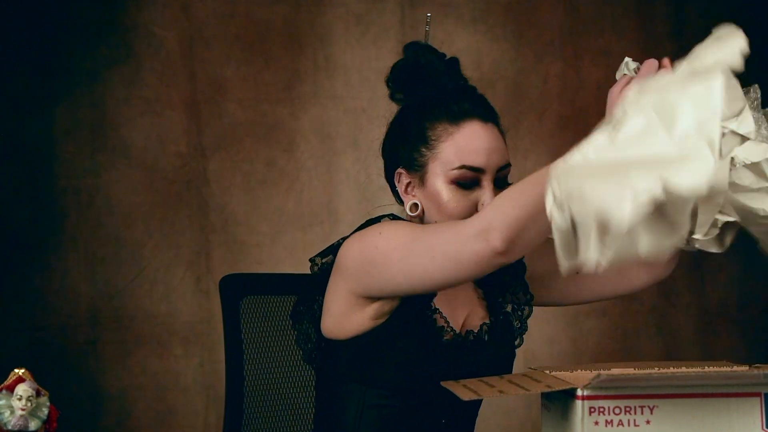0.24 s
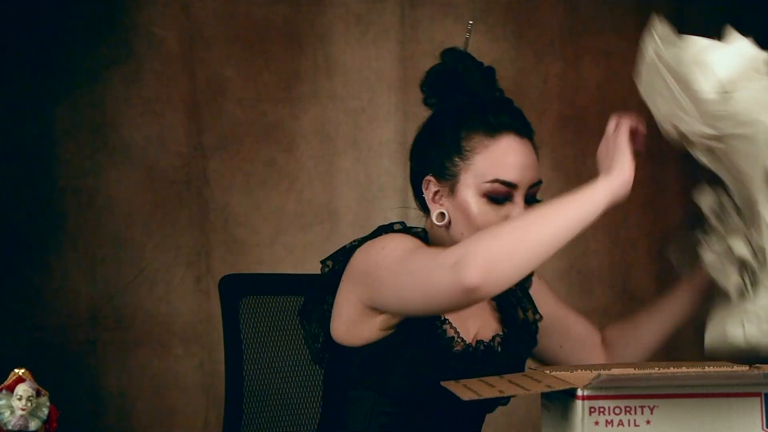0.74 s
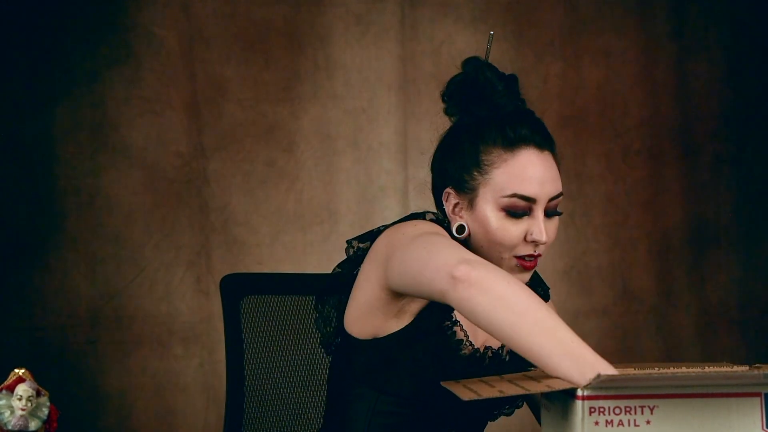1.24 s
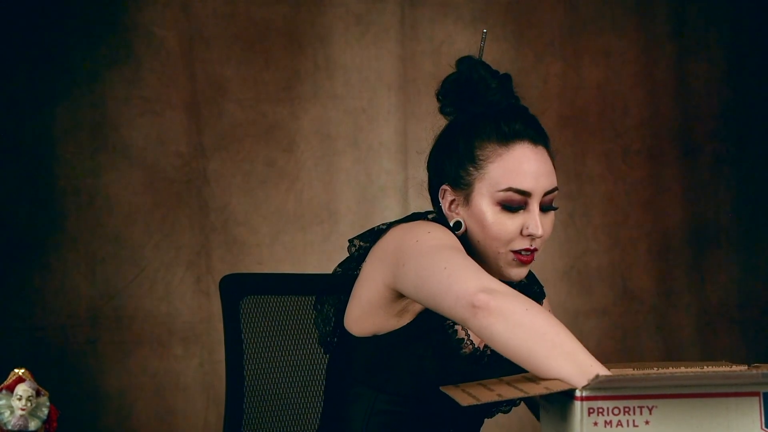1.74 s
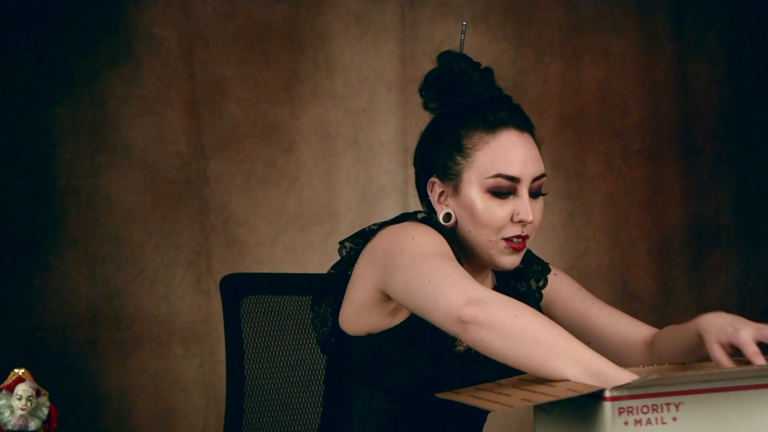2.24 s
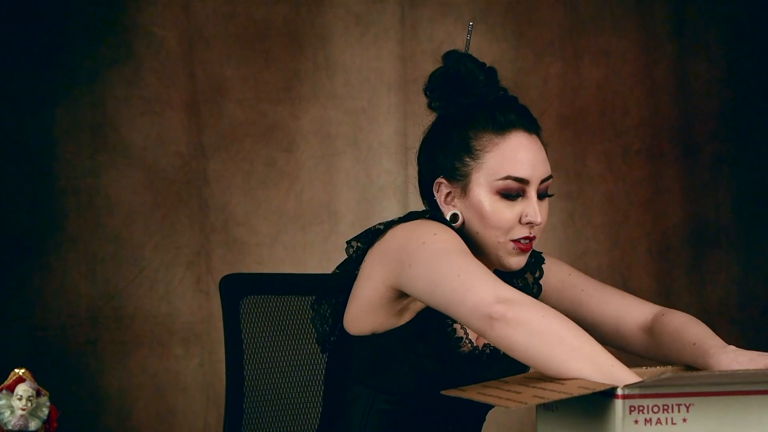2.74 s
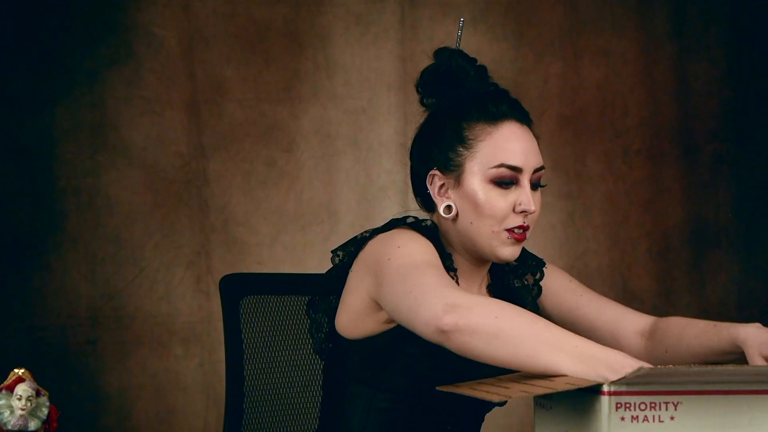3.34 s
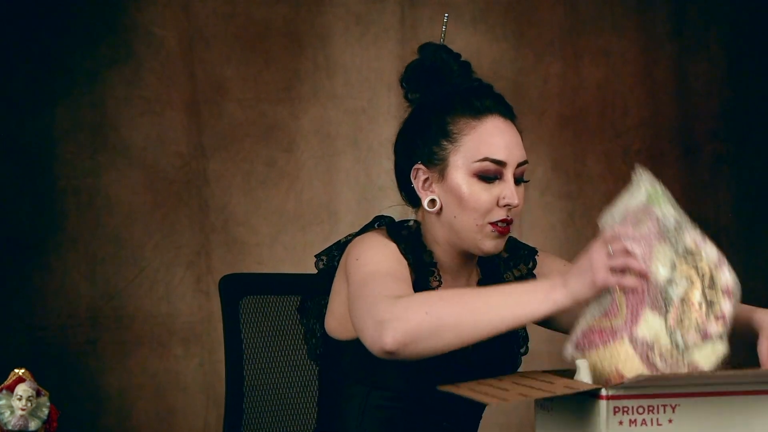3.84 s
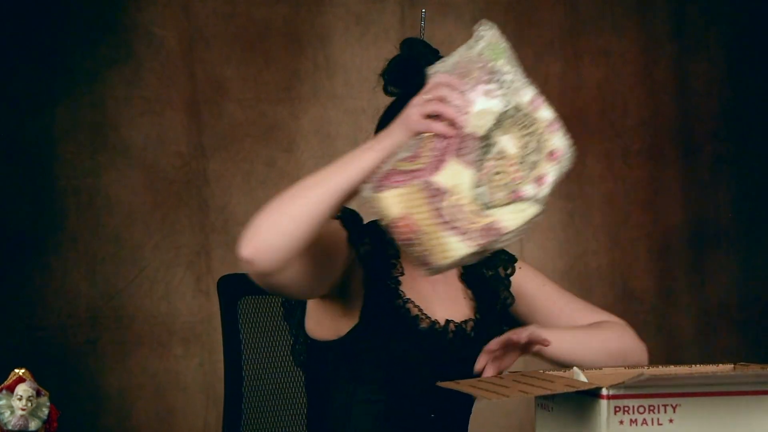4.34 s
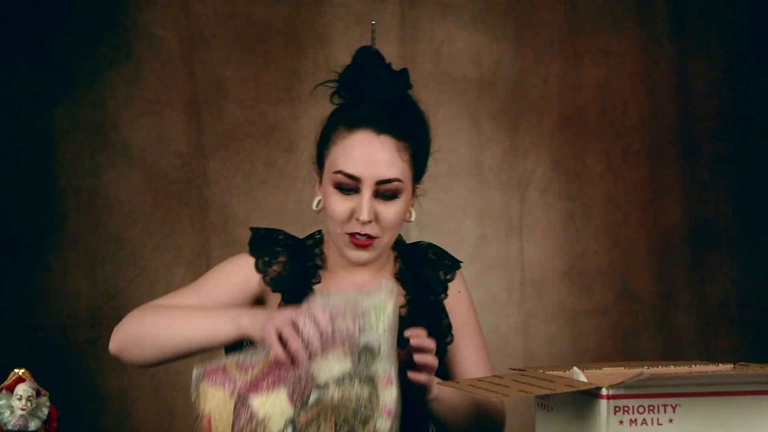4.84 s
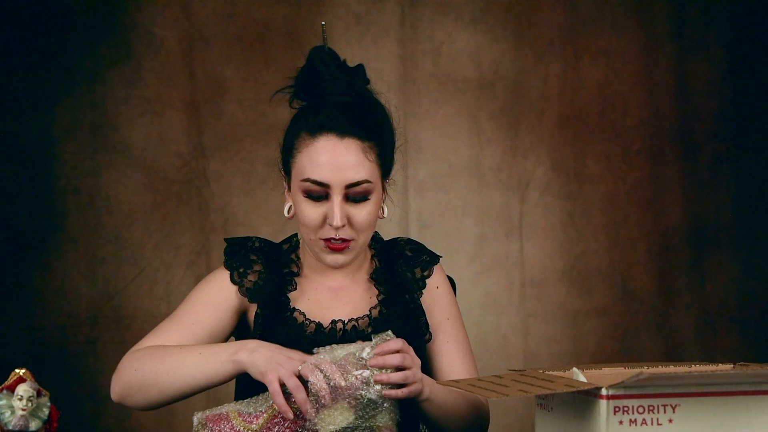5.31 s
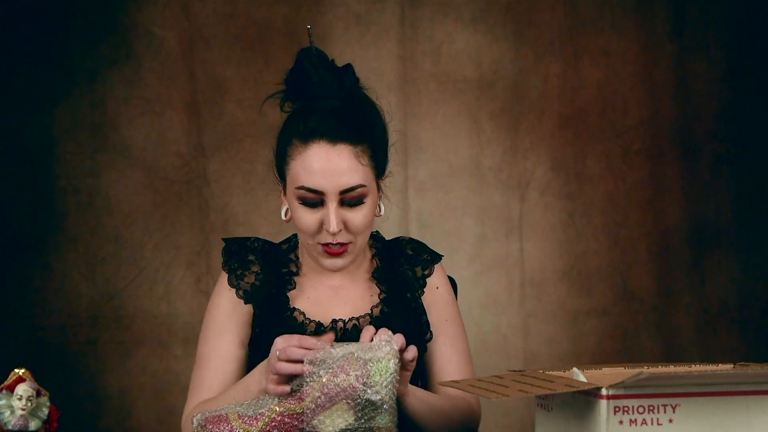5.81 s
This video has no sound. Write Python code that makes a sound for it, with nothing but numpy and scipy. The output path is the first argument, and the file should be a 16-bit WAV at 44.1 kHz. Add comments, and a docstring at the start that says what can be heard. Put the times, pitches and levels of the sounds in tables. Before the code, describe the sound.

Tissue paper crackles loudly and is tossed aside, hands rummage in a cardboard box with dull bumps, then bubble wrap crinkles softly with sharp pops.

```python
"""Tissue paper is lifted out of a cardboard box and tossed aside; hands rummage in the rest and bump the box.
A parcel in bubble wrap is dragged out along the cardboard wall, then turned over and picked at.
Paper and film are clouds of tiny snaps shaped in bands, with ringing facets, stiff creases and air cells.
Cardboard is stick-slip rumble and struck modes. One microphone hears it in a small, fairly live room."""
import sys
import numpy as np
from scipy import signal
from scipy.fft import rfft, irfft
from scipy.io import wavfile
from scipy.ndimage import uniform_filter1d

SR = 44100
rng = np.random.default_rng(int(sys.argv[2]) if len(sys.argv) > 2 else 0)


def dump_mix(stems):
    """Bounce the given channels to the path in sys.argv[1] as a 16-bit WAV at rate SR."""
    frames = np.atleast_2d(stems).T  # one column per channel
    limited = np.clip(frames, -1, 1)  # hard clip at full scale
    pcm = np.round(limited * 32767).astype(np.int16)
    wavfile.write(sys.argv[1], SR, pcm)


N = 267637
TIME = np.arange(N) / SR
STEPS = TIME[::44]  # coarse time grid for hand movement
BODY_HZ = 2000  # below this a tight crease loses body
EDGES = np.geomspace(70, 17000, 20)
# bands: (centre Hz, width Hz, filter)
BANDS = [
    (np.sqrt(low * high), high - low, signal.butter(2, [low, high], "band", fs=SR, output="sos"))
    for low, high in zip(EDGES, EDGES[1:])
]


def from_db(db):
    """Decibels to gain."""
    return np.exp(np.asarray(db) * (np.log(10) / 20))


def rms_one(x):
    """Scale to unit rms."""
    return x / np.sqrt(np.mean(x ** 2) + 1e-20)


def at_hz(points, hz):
    """Read a table along log frequency."""
    points = np.array(points)
    return np.interp(np.log(hz), np.log(points[:, 0]), points[:, 1])


def drift(rate):
    """Random wander of rms 1 with the given number of turning points per second."""
    knots = rng.standard_normal(int(N / SR * rate) + 2)
    return rms_one(np.interp(TIME * rate, np.arange(len(knots)), knots))


def clicks(at, sizes):
    """Impulses at the given samples."""
    out = np.full(N, 1e-18)
    out[np.clip(at, 0, N - 1).astype(int)] = sizes
    return out


def damped_sine(hz, keep, blows):
    """A resonance that rings at one pitch after each blow, keeping a fixed part of its height per sample."""
    w = 2 * np.pi * hz / SR
    return signal.lfilter([0, np.sin(w)], [1, -2 * keep * np.cos(w), keep * keep], blows)


def thin(x):
    """A small facet radiates little bass."""
    return signal.sosfilt(signal.butter(2, BODY_HZ, "high", fs=SR, output="sos"), x)


def band_shares(colour):
    """Gain of each band for a spectrum of total power 1."""
    gains = np.array([from_db(at_hz(colour, hz)) * np.sqrt(width) for hz, width, sos in BANDS])
    return gains / np.linalg.norm(gains)


def treble_share(hz):
    """How much a pitch gains when tight creases snap faster than loose ones."""
    return np.interp(np.log(hz), np.log([4200, 8000, 11000]), [0, .65, 1.15])


def tint(hz, extra_sharp_db):
    """Gain at one pitch: tighter creases than usual are brighter and have less body."""
    bass = np.clip(np.log(BODY_HZ / hz) / 2, 0, 1)
    return from_db(treble_share(hz) * extra_sharp_db - bass * np.maximum(extra_sharp_db, 0))


def stroke_power(rows, rise_db_per_s, fall_db_per_s):
    """Power of each stroke on the STEPS grid: it swells, holds while the hand moves, then dies away."""
    start, length, level_db = np.transpose(rows)[:3, :, None]
    before = np.maximum(start - STEPS, 0)
    after = np.maximum(STEPS - start - length, 0)
    return from_db(level_db - rise_db_per_s * before - fall_db_per_s * after) ** 2


def handling(rows, rise_db_per_s, fall_db_per_s, creep_db, creep_sharp_db):
    """Gain and sharpness of a sheet: overlapping strokes blend their colours by loudness, and faint creeping
    surrounds each."""
    strokes = stroke_power(rows, rise_db_per_s, fall_db_per_s)
    # the sheet stirs faintly as the hand closes on it and settles after it lets go
    stirring = stroke_power(rows, rise_db_per_s=130, fall_db_per_s=30).max(axis=0)
    creep = from_db(creep_db) ** 2 * stirring
    power = strokes.sum(axis=0) + creep + 1e-18
    sharp_db = (np.array(rows)[:, 3] @ strokes + creep_sharp_db * creep) / power
    return np.interp(TIME, STEPS, np.sqrt(power)), np.interp(TIME, STEPS, sharp_db)


def snaps(per_s, spread_db, clump_db, own_db, rub):
    """Tiny snaps in clumps over smooth rubbing, each with its own colour; one level-evened signal a band."""
    chance = per_s * from_db(clump_db * drift(110)) / SR
    at = np.flatnonzero(rng.random(N) < chance)
    sizes = from_db(spread_db * np.minimum(rng.exponential(1, len(at)), 3))
    rubbing = rub * rng.standard_normal((2, N))
    for k, (hz, width, sos) in enumerate(BANDS):
        own_colour = from_db(own_db * rng.uniform(-0.97, 1, len(at)))
        strengths = sizes * rng.choice([-1, 1], len(at)) * own_colour
        band = signal.sosfilt(sos, rms_one(clicks(at, strengths)) + rubbing[k % 2])
        local_power = uniform_filter1d(band ** 2, size=1500 + int(20 * SR / width))
        yield band / np.sqrt(np.abs(local_power) + 1e-12)


def crinkle(motion, folds, colour, grains, usual_sharp_db, fold_db, crack_db, fold_s, patchy_db):
    """Steady crinkling, and a crack with a dying avalanche of snaps whenever a fold gives way."""
    gain, sharp_db = motion
    s, peak_db, fold_sharp_db = np.transpose(folds)
    out = np.zeros(N)
    keep = np.exp(-2 / (fold_s * SR))  # power kept per sample
    for (hz, width, sos), share, band in zip(BANDS, band_shares(colour), grains):
        steady = gain * tint(hz, sharp_db - usual_sharp_db)
        kicks = from_db(peak_db + fold_db) * tint(hz, fold_sharp_db - usual_sharp_db)
        avalanche = signal.lfilter([1], [1, -keep], clicks(s * SR, kicks ** 2))
        blows = clicks(s * SR, kicks * rng.choice([-1, 1], len(s)))
        crack = from_db(crack_db) * np.sqrt(SR / width) * signal.sosfilt(sos, blows)
        crack *= min(hz / BODY_HZ, 1)
        # the facets change size as the sheet moves, so its resonances come and go
        patches = from_db(patchy_db * drift(35))
        out += share * (band * np.sqrt(steady ** 2 + avalanche) + crack) * patches
    return out


def ticks(motion, colour, usual_sharp_db, per_s, low_hz, high_hz, ring_s, spread_db):
    """Now and then one facet flips over: it swells and rings briefly at a pitch of its own."""
    gain, sharp_db = motion
    at = np.flatnonzero(rng.random(N) < per_s / SR)
    pitch, size, length = rng.random((len(at), 3)).T
    hz = low_hz * (high_hz / low_hz) ** pitch
    own_size = from_db(.5 * at_hz(colour, hz) + spread_db * (size - 1.5))
    height = gain[at] * tint(hz, sharp_db[at] - usual_sharp_db) * own_size
    n = np.arange(int(20 * ring_s * SR))
    age = n / (SR * ring_s * (.5 + length[:, None]))
    envelope = age * np.exp(1 - age)
    rings = height[:, None] * np.sin(2 * np.pi * hz[:, None] * n / SR) * envelope
    # overlapping rings add up
    return thin(np.bincount((at[:, None] + n).ravel(), rings.ravel(), N)[:N])


def tissue_motion():
    """Loose paper takes a moment to get going and to come to rest."""
    # hands push, pull or crush the tissue: start t/s, length/s, relative level/dB,
    # sharpness/dB (top treble over the middle)
    tissue_strokes = [(0.0, 0.0017, -17.5, -15), (0.055, 0.15, -26, -22), (0.19, 0.062, -17, -13),
                      (0.275, 0.036, -23, -10.5), (0.33, 0.14, -29.5, -20), (0.437, 0.063, -25.5, -16),
                      (0.57, 0.06, -27, -31), (0.628, 0.098, -22, -17.5), (0.76, 0.059, -24, -8.5),
                      (0.98, 0.42, -44.5, -23.5), (1.307, 0.03, -32.5, -16), (1.395, 0.034, -35, -5),
                      (1.46, 0.15, -41, -15), (1.662, 0.015, -35, -20), (1.703, 0.057, -20, -14.5),
                      (1.82, 0.022, -31.5, -11), (2.21, 0.067, -44, -3.5), (2.33, 0.055, -43.5, -22),
                      (2.492, 0.028, -47, -9), (2.60, 0.36, -56, -12), (2.805, 0.14, -44, -15),
                      (2.925, 0.059, -41.5, -9), (2.992, 0.02, -28, -17), (3.206, 0.093, -27, -5),
                      (3.33, 0.18, -31.5, -23), (3.48, 0.072, -30, -15), (3.56, 0.045, -27, -21),
                      (3.66, 0.086, -30, -26), (3.795, 0.13, -37, -12)]
    return handling(tissue_strokes, rise_db_per_s=1098.0, fall_db_per_s=305.5,
                    creep_db=-20.5, creep_sharp_db=-14.5)


def tissue():
    """Thin paper: very dense, fine snaps, with larger facets flipping over among them."""
    # folds of tissue giving way: t/s, relative peak level/dB, sharpness/dB
    tissue_folds = [(0.14, -5, -14), (0.185, -1.5, -10.5), (0.227, -1.5, 1), (0.788, -3, 0.5),
                    (1.593, -20.5, 2), (1.707, -9, -8), (3.204, -16, 1.5), (3.273, -6.5, -9.5),
                    (3.693, -9, -30)]
    # colour of the crinkling paper: f/Hz, relative level per Hz/dB
    tissue_colour = [(60, -46.5), (130, -35.5), (200, -22), (310, -5.5), (560, -2.5), (1100, 3.5),
                     (2000, 5.5), (3000, -1), (4800, 0.5), (6200, -9.5), (8500, -13.5), (11000, -21.5),
                     (15000, -34)]
    motion = tissue_motion()
    grains = snaps(per_s=1200, spread_db=2.5, clump_db=2, own_db=10, rub=0.12)
    rustle = crinkle(motion, tissue_folds, tissue_colour, grains, usual_sharp_db=-12.5,
                     fold_db=-10.0, crack_db=8, fold_s=0.006, patchy_db=1.6)
    facets = ticks(motion, tissue_colour, usual_sharp_db=-13, per_s=450,
                   low_hz=2600, high_hz=9000, ring_s=.0007, spread_db=17)
    return from_db(-2.5) * rustle + from_db(14) * facets


def air():
    """Faint steady background of the room: noise shaped by a smooth spectrum."""
    # colour of the still room: f/Hz, relative level per Hz/dB
    air_colour = [(30, -29), (70, -7), (140, 1.5), (300, 4.5), (600, -2.5), (1200, -2.5), (3000, -16.5),
                  (15000, -31)]
    hz = np.maximum(np.fft.rfftfreq(N, 1 / SR), 1)
    shaped = irfft(rfft(rng.standard_normal(N)) * from_db(at_hz(air_colour, hz)), N)
    return from_db(-63.5) * rms_one(shaped)


def drag(rummage_db=-22):
    """Whatever moves inside the box sticks and slips along its walls, which rumble."""
    # paper, parcel and arm catch on the cardboard and slide: start t/s, length/s, relative level/dB
    slides = [(0.21, 0.041, -38.5), (3.2, 0.072, -51.5), (3.38, 0.036, -53.5), (3.555, 0.037, -45),
              (3.69, 0.075, -48), (3.86, 0.071, -51.5)]
    # colour of the rumbling walls: f/Hz, relative level per Hz/dB
    wall_colour = [(60, -36.5), (105, -13.5), (170, -16.5), (230, -4.5), (300, 12), (420, 2.5), (580, 3.5),
                   (800, -1.5), (1500, -27)]
    # the hand goes down into the box: from t/s, to t/s
    in_box_s = (1.0, 1.3)
    slide_power = stroke_power(slides, rise_db_per_s=698, fall_db_per_s=401).sum(axis=0)
    scrapes = np.interp(TIME, STEPS, np.sqrt(slide_power))
    # rummaging follows the tissue until the second slide begins
    inside = np.interp(TIME, in_box_s, [0, 1]) * (TIME < slides[1][0])
    rummage = from_db(rummage_db) * tissue_motion()[0] * inside
    slips = snaps(per_s=190, spread_db=0.5, clump_db=2.5, own_db=4.5, rub=0.44)
    shares = band_shares(wall_colour)[EDGES[:-1] < wall_colour[-1][0]]
    rumble = sum(share * band for share, band in zip(shares, slips))
    return from_db(10) * (scrapes + rummage) * rumble


def crisp_snaps(ring_s=0.0023, swell_cycles=2.0, stutter_s=.004, loss_db=3):
    """A stiff crease pops through in three quick jerks, each setting its facet ringing."""
    # single stiff creases of paper or film: t/s, relative ring level/dB, pitch of the first jerk f/Hz
    creases = [(0.748, -21.5, 9000), (1.063, -34, 7740), (1.316, -22.5, 4240), (1.405, -27.5, 8250),
               (1.558, -31, 7200), (2.198, -31, 6500), (2.862, -31, 4700), (3.203, -36.5, 10100),
               (3.603, -25, 6790), (3.660, -29, 7200), (3.764, -21, 4600), (3.795, -27, 7350),
               (3.845, -31.5, 7800), (4.896, -43.5, 7040), (5.072, -26, 3300), (5.63, -33, 4570),
               (5.707, -28.5, 4720), (5.893, -36, 4640), (6.061, -35, 4460)]
    out = np.zeros(N + SR)
    t = TIME[:SR // 20]
    chances = rng.uniform(-1, 1, (len(creases), 3, 2))
    for (s, peak_db, hz), chance in zip(creases, chances):
        envelope = (1 - np.exp(-t * hz / swell_cycles)) * np.exp(-t / ring_s)
        for k, (late, detune) in enumerate(chance):
            start = int((s + stutter_s * k * (1 + late / 2)) * SR)
            ring = np.sin(2 * np.pi * hz * (1 + k * detune / 10) * t)
            out[start:start + len(t)] += from_db(peak_db - loss_db * k) * envelope * ring
    return thin(out[:N])


def bumps(width_octaves=0.57):
    """Each blow rings the cardboard modes near its own pitch."""
    # dull bumps on box and parcel: t/s, relative peak level/dB, pitch where the blow is strongest f/Hz
    blow_rows = [(2.359, -43, 874), (2.381, -41, 121), (2.392, -45.5, 870), (2.502, -32.5, 480),
                 (3.211, -31.5, 294), (3.222, -29, 110), (3.242, -34.5, 280), (3.393, -44, 320),
                 (3.426, -43, 324), (3.598, -39, 318), (3.694, -33, 570), (3.759, -38.5, 476),
                 (3.868, -36.5, 366), (3.908, -43, 360), (4.513, -62, 784), (5.617, -44.5, 576)]
    # cardboard modes: f/Hz, relative level/dB, time to fall by 60 dB t60/s
    cardboard = [(113, -12.5, 0.21), (277.5, 5, 0.17), (323.4, 3.5, 0.14), (363, 1.5, 0.081),
                 (463, 3.5, 0.13), (579, 5.5, 0.12), (699, 3, 0.063), (866, 4, 0.11)]
    s, peak_db, pitch = np.transpose(blow_rows)
    out = np.zeros(N)
    for k, (hz, level_db, t60) in enumerate(cardboard):
        reach = 1 / (1 + (np.log2(hz / pitch) / width_octaves) ** 2)
        heights = reach * from_db(peak_db + level_db + rng.normal(0, 1, len(s)))
        keep = from_db(-60 / (t60 * SR))
        # neighbouring modes start in opposite phase
        out += (-1) ** k * damped_sine(hz, keep, clicks(s * SR, heights))
    return from_db(-0.5) * out


def pops(pop_hz=4500, ring_s=.00022):
    """A taut air cell dimples in with one dry, hard click."""
    # air cells of the wrap click: t/s, relative peak level/dB
    cell_clicks = [(3.301, -10), (3.61, -13), (5.51, -14), (5.5133, -13)]
    s, peak_db = np.transpose(cell_clicks)
    keep = np.exp(-1 / (ring_s * SR))
    return thin(damped_sine(pop_hz, keep, clicks(s * SR, from_db(peak_db))))


def bubble_wrap(reach_octaves=0.44):
    """Plastic film: fewer snaps and short squeaks ring the air cells nearest in pitch to the pressed patch."""
    # fingers grip or press the wrap: start t/s, length/s, relative level/dB, sharpness/dB
    wrap_strokes = [(3.963, 0.0061, -41, 9), (4.0, 0.01, -43.5, 15.5), (4.14, 0.29, -64.5, -6.5),
                    (4.896, 0.0073, -44, -20), (5.064, 0.0086, -40.5, 5.5), (5.14, 0.28, -48, -9.5),
                    (5.205, 0.012, -50, -9), (5.38, 0.06, -42.5, -5.5), (5.474, 0.067, -38.5, -6.5),
                    (5.63, 0.004, -37, -19), (5.706, 0.0074, -51, -11), (5.9, 0.071, -40, -14),
                    (6.06, 0.011, -42.5, -7)]
    # plastic film buckling: t/s, relative peak level/dB, sharpness/dB
    wrap_folds = [(4.894, -26, -21), (5.073, -20, 2), (5.203, -26, -3), (5.51, -22, -4),
                  (6.061, -16.5, -24)]
    # colour of the crinkling film: f/Hz, relative level per Hz/dB
    wrap_colour = [(100, -19), (400, -1), (1150, -0.5), (1550, -2.5), (2100, 2), (3000, -4), (4700, 2),
                   (6200, -1.5), (8500, -9.5), (11000, -13), (15000, -17)]
    # the patch under the fingers rings higher when it is small and taut: t/s, f/Hz
    patch_pitch = [(4.3, 1100), (4.85, 4550), (5.25, 4360), (5.40, 2300), (5.52, 3950), (5.62, 4500),
                   (5.80, 4500), (5.89, 2000)]
    # ringing of the air cells: f/Hz, width/Hz, boost/dB
    film_modes = [(2000, 206, 8), (3060, 980, 10.5), (4495, 540, 7.5)]
    motion = gain, sharp_db = handling(wrap_strokes, rise_db_per_s=650, fall_db_per_s=413,
                                       creep_db=-9, creep_sharp_db=-9.5)
    grains = snaps(per_s=450, spread_db=2.5, clump_db=3, own_db=8, rub=0.12)
    rustle = crinkle(motion, wrap_folds, wrap_colour, grains, usual_sharp_db=-8.5,
                     fold_db=-12.5, crack_db=7, fold_s=0.007, patchy_db=2.0)
    pitch = np.interp(TIME, *np.transpose(patch_pitch))
    cells, squeaks = 0, 0
    for hz, width, boost_db in film_modes:
        pressed = from_db(boost_db) / (1 + (np.log2(pitch / hz) / reach_octaves) ** 2)
        cells = cells + signal.lfilter(*signal.iirpeak(hz, hz / width, fs=SR), rustle * pressed)
        squeaks = squeaks + ticks((gain * pressed, sharp_db), wrap_colour, usual_sharp_db=-9, per_s=90,
                                  low_hz=hz - width / 2, high_hz=hz + width / 2,
                                  ring_s=.0015, spread_db=14)
    facets = ticks(motion, wrap_colour, usual_sharp_db=-9, per_s=150,
                   low_hz=3000, high_hz=12000, ring_s=.0007, spread_db=14)
    return from_db(-6) * (rustle + cells / 2) + from_db(4.5) * squeaks + from_db(3) * facets


def nearby_echoes(x, echo_db, fade_s, size=2048):
    """Reflections off box, table and body; the sheet keeps moving, so their pattern keeps changing."""
    out = np.zeros(N + 4 * size)
    window = np.sin(np.pi * np.arange(2 * size) / (2 * size))
    padded = np.pad(x, (size, 2 * size))
    for start in range(0, N + size, size):
        pattern = rng.standard_normal(size // 2) * np.exp(-TIME[:size // 2] / fade_s)
        pattern /= np.linalg.norm(pattern)
        echo = signal.fftconvolve(padded[start:start + 2 * size] * window, pattern)
        out[start:start + len(echo)] += echo
    return x + from_db(echo_db) * out[size:size + N]


def room_tail(x, build_s):
    """Each band's energy builds up between the walls and lingers as diffuse sound."""
    # reverberation: f/Hz, time to fall by 60 dB t60/s
    room_t60 = [(100, 0.17), (500, 0.6), (4000, 0.23), (12000, 0.054)]
    out = np.zeros(N)
    white = rng.standard_normal((2, N))
    near = np.exp(-1 / (build_s * SR))
    for k, (hz, width, sos) in enumerate(BANDS):
        far = from_db(-120 / (at_hz(room_t60, hz) * SR))  # energy kept per sample
        power = signal.sosfilt(sos, x) ** 2 + 1e-18
        build_and_fade = np.convolve([1, -near], [1, -far])
        energy = signal.lfilter([(1 - near) * (1 - far)], build_and_fade, power)
        out += rms_one(signal.sosfilt(sos, white[k % 2])) * np.sqrt(np.abs(energy))
    return out


def scene():
    """Everything reaches one microphone, heard alike in both ears."""
    handled = nearby_echoes(tissue() + bubble_wrap() + crisp_snaps(), echo_db=-4, fade_s=0.005)
    sheets = from_db(-1.71) * handled + pops()
    box = drag() + bumps()
    tail = room_tail(from_db(-3.0) * sheets + from_db(-9.5) * box, build_s=0.0025)
    mono = sheets + box + tail + air()
    return np.array([mono, mono])


def record(dry):
    """Each channel adds faint hiss and the highest peaks are rounded; rumble and the very top are cut."""
    hissy = dry + from_db(-69.5) * rng.standard_normal((2, N))
    rounded = .7 * np.tanh(hissy / .7)
    lean = signal.sosfilt(signal.butter(4, 76, "high", fs=SR, output="sos"), rounded)
    return signal.sosfilt(signal.ellip(10, .1, 90, 15600, fs=SR, output="sos"), lean)


dry = scene()
out = record(dry)
dump_mix(out)
```